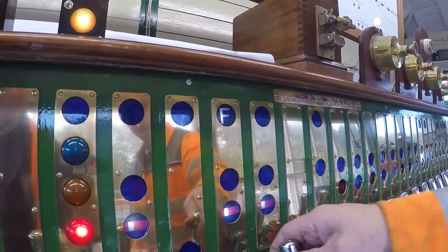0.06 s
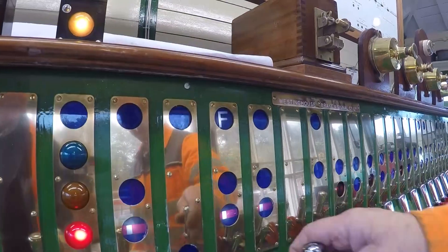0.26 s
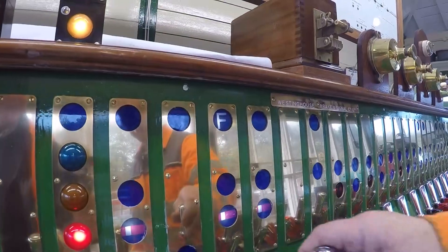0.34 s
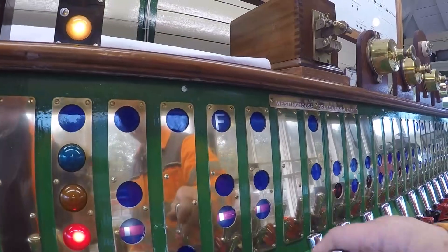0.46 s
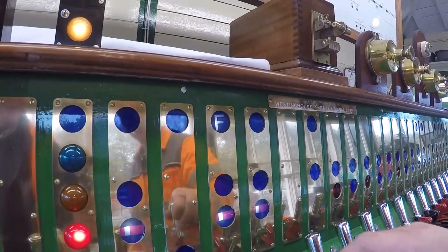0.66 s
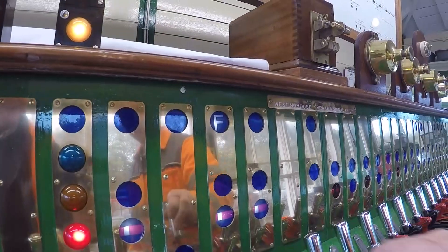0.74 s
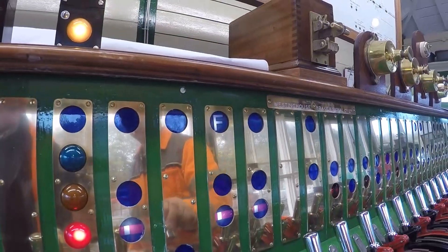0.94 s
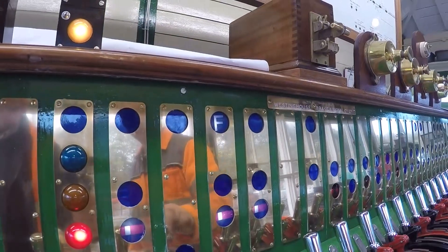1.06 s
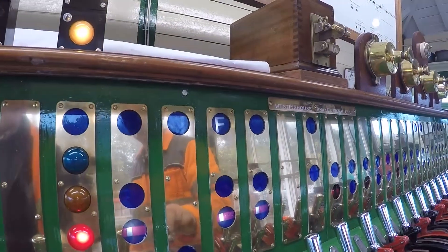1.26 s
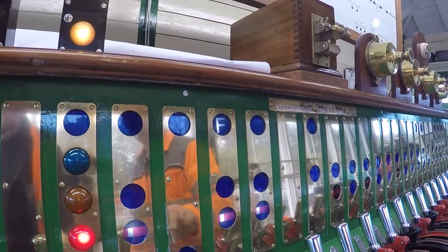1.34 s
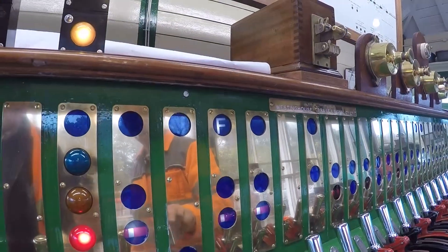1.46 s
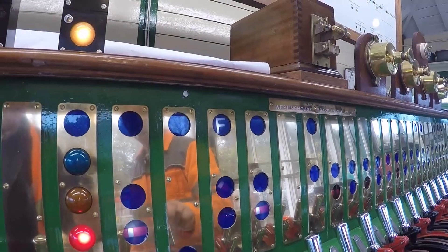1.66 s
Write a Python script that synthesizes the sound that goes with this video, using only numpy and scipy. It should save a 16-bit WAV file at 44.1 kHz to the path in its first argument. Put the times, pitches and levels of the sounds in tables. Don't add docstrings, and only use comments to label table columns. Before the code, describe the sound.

Metal levers clank and clack in a wooden signal cabin, rattling, knocking home and snapping shut

```python
import sys
import numpy as np
from scipy import signal
from scipy.io import wavfile
from scipy.ndimage import uniform_filter1d

SR = 44100
rng = np.random.default_rng(int(sys.argv[2]) if len(sys.argv) > 2 else 0)


def nominal_scale(level):
    x = np.asarray(level, float) / 20
    return 10 ** x


def log_audio(samples):
    frames = np.atleast_2d(samples).T
    limited = np.clip(frames, -1, 1)
    pcm = np.round(limited * 32767).astype(np.int16)
    wavfile.write(sys.argv[1], SR, pcm)


N = 74970
LEAD = SR // 5


def evened(x):
    return x / np.sqrt(np.mean(x ** 2) + 1e-20)


def read(points, hz):
    f, value = np.transpose(points)
    return np.interp(np.log(hz + 1), np.log(f + 1), value)


def lowpassed(x, hz):
    taps = signal.firwin(255, hz, window=("kaiser", 8), fs=SR)
    return signal.oaconvolve(x, taps, "same")


def shade(colour, bands, hz):
    humps = sum((nominal_scale(2 * db) - 1) / (1 + (2 * (hz - f) / width) ** 2) for f, width, db in bands)
    broad = nominal_scale(np.maximum(read(colour, hz), -100))
    return broad * np.sqrt(np.maximum(1 + humps, .01))


def causal(colour, bands, size=4096):
    hz = abs(np.fft.fftfreq(size, 1 / SR))
    log_gain = np.log(shade(colour, bands, hz))
    taps = np.fft.ifft(np.exp(np.conj(signal.hilbert(log_gain)))).real
    half = size // 2
    if abs(taps[:half]).sum() <= abs(taps[half:]).sum():
        taps = np.roll(taps[::-1], 1)
    return taps[:half] / np.linalg.norm(taps)


# frequency in Hz, t60 in seconds.
CABIN_T60 = [(150, 1), (500, 0.28), (1500, 0.44), (4000, 0.47), (9000, 0.33), (15000, .24)]


def cabin(power, colour, bands):
    delay_s, build_s = 0.0041, 0.0058
    hz, t, z = signal.stft(rng.standard_normal(len(power)), SR, nperseg=256, noverlap=192)
    fed = np.interp(t, np.arange(len(power)) / SR, uniform_filter1d(power, 64))
    build = np.clip((t - delay_s) / build_s, 0, 1)
    decay = nominal_scale(-120 * t / read(CABIN_T60, hz)[:, None]) * build
    decay = decay / decay.sum(1)[:, None]
    stored = signal.fftconvolve(fed[None], decay, axes=1)[:, :len(t)]
    tint = evened(shade(colour, bands, hz))[:, None]
    tail = signal.istft(z * np.sqrt(abs(stored)) * tint, SR, nperseg=256, noverlap=192)[1]
    return lowpassed(tail[:len(power)], 15200)


def ringing(t, power, pitches_hz, modes):
    waver_hz = 60.07
    out, slow = np.zeros(len(t)), t[::32]
    for hz, (db, t60) in zip(pitches_hz, modes):
        kept = nominal_scale(-120 / t60 / SR)
        stored = signal.lfilter([1e-3], [1, -kept], power)
        rates, starts = rng.random((2, 8, 1))
        wavers = np.exp(2j * np.pi * (waver_hz * (2 * rates - 1) * slow + starts))
        flutter = 0.62 + 1.04 * wavers.sum(0) / np.sqrt(8)
        tone = (np.exp(2j * np.pi * hz * t) * np.interp(t, slow, flutter)).imag
        out += nominal_scale(db) * np.sqrt(stored) * tone
    return out


def part(blows, colour, bands, pitches_hz, modes, ring_db, tail_db):
    rise_s, grain_db = .0009, 1.67
    t = (np.arange(N + LEAD) - LEAD) / SR
    power = np.zeros(len(t))
    for s, db, hold, t60 in blows:
        onset = np.clip((t - s) / rise_s, 0, 1) ** 2
        power += onset * nominal_scale(2 * (db - 60 * np.maximum(t - s - hold, 0) / t60))
    noise, grain = rng.standard_normal((2, len(t)))
    contacts = evened(noise * nominal_scale(grain_db * evened(uniform_filter1d(grain, 90))))
    chatter = signal.fftconvolve(np.sqrt(power) * contacts, causal(colour, bands))[:len(t)]
    near = lowpassed(chatter, 15200)
    tail = nominal_scale(tail_db) * cabin(power, colour, bands)
    ring = nominal_scale(ring_db) * ringing(t, power, pitches_hz, modes)
    return (near + tail + ring)[LEAD:]


# frequency in Hz, level in dB.
AIR_COLOUR = [(26, -38), (45, 5.5), (307, -20), (702, -22), (1260, -23), (2000, -32), (2310, -28),
              (13600, -49.5), (15000, -46)]


def air():
    level_db = -44.5
    frames, hz = N // 256 + 5, np.fft.rfftfreq(1024, 1 / SR)
    a, b, patches = rng.standard_normal((frames, 513, 3)).T
    patches = evened(uniform_filter1d(uniform_filter1d(patches, 10, 0), 12, 1))
    heard = ((hz > 40) & (hz < 14200))[:, None]
    z = (a + 1j * b) * nominal_scale(read(AIR_COLOUR, hz)[:, None] + 2.1 * patches) * heard
    return nominal_scale(level_db) * evened(signal.istft(z, nperseg=1024, noverlap=768)[1][:N])


# time in seconds, pitch in Hz, level in dB.
RUMBLE_PATH = [(0.0, 31.9, -37), (0.112, 30.8, -44), (0.188, 29.95, -55), (0.292, 33.04, -43),
               (0.396, 31.65, -33.5), (0.478, 33.04, -51), (0.606, 32.96, -33), (0.804, 33.4, -43.5),
               (0.95, 33.44, -34.5), (1.088, 33.16, -48), (1.126, 34.8, -40.5), (1.278, 32.42, -36.5),
               (1.406, 33.25, -52), (1.528, 32.44, -38.5), (1.666, 30, -48), (1.7, 33.2, -65)]


def rumble():
    t = np.arange(N) / SR
    s, hz, db = np.transpose(RUMBLE_PATH)
    turns = np.cumsum(np.interp(t, s, hz)) / SR
    return np.sqrt(2) * nominal_scale(np.interp(t, s, db)) * np.sin(2 * np.pi * turns)


# start in seconds, level in dB, chatter hold in seconds, chatter t60 in seconds.
LINK_HITS = [
    (-.1, -54, 0.25, 0.57),
    (.216, -31, 0.011, 0.039),
    (.226, -27, 0.017, 0.14),
    (.41, -43, 0.033, 0.2),
]
# frequency in Hz, gain in dB.
LINK_TINT = [(200, -5), (550, -12), (800, -15), (1300, -3), (1800, -14), (4000, -18), (12000, -43),
             (15000, -101)]
LINK_PITCHES = [545, 1242, 1500]
# level in dB, t60 in seconds.
LINK_RINGS = [(0.5, 0.27), (-24, 0.066), (1, 0.09)]


def link():
    return part(LINK_HITS, LINK_TINT, [], LINK_PITCHES, LINK_RINGS, ring_db=-8.5, tail_db=-5)


# start in seconds, level in dB, chatter hold in seconds, chatter t60 in seconds.
CATCH_HITS = [
    (-.09, -26, 0.0024, 0.024),
    (1.3818, -12, 0.00071, 0.023),
    (1.385, -21, 0.0046, 0.056),
    (1.395, -30, 0.0031, 0.19),
]
# frequency in Hz, gain in dB.
CATCH_TINT = [(200, -11), (800, -13.5), (1200, -7), (2400, -10), (3600, -8.5), (5500, -13.5), (8000, -10),
              (15500, -19.5)]
# centre in Hz, width in Hz, dB over the colour.
CATCH_HUMPS = [(1110, 310, 6.5), (1710, 180, 2.7), (3540, 400, 7.3), (5410, 330, 7.8), (7260, 160, 2.7),
               (8020, 180, 9.5), (8920, 150, 10.4), (10000, 220, 5.7), (10750, 140, 2.7)]
CATCH_PITCHES = [345, 395, 1180, 1645, 3476, 3600, 3709, 8193, 8974, 10760]
# level in dB, t60 in seconds.
CATCH_RINGS = [(-11, 0.38), (-10, 0.2), (11, 0.015), (-14.5, 0.27), (-17, 0.39), (5.5, 0.016),
               (-11.5, 0.38), (-24, 0.3), (-34, 0.39), (-32, 0.16)]


def catch():
    return part(CATCH_HITS, CATCH_TINT, CATCH_HUMPS, CATCH_PITCHES, CATCH_RINGS, ring_db=-6.5, tail_db=-8)


# start in seconds, level in dB, t60 in seconds.
CONTACT_TICKS = [
    (-.02, -56, 0.27),
    (.2248, -39, 0.016),
    (.549, -44, 0.018),
    (1.1151, -13, .025),
    (1.3817, -19, 0.023),
]


def ticks():
    t = np.arange(N) / SR
    treble = signal.butter(2, 4800, "high", fs=SR, output="sos")
    hiss = signal.sosfilt(treble, rng.standard_normal(N))
    level = sum((t > s) * nominal_scale(db - 60 * abs(t - s) / t60) for s, db, t60 in CONTACT_TICKS)
    return lowpassed(hiss * level, 15600)


# start in seconds, pitch in Hz, level in dB, t60 in seconds.
STEEL_KNOCKS = [(.2155, 1330, -34, 0.11), (.2248, 4800, -8, 0.023), (.2255, 3840, -11, 0.028),
                (.226, 9200, -22.5, 0.035), (.545, 6000, -26, .02), (.546, 4300, -23, 0.042),
                (.5495, 4900, -22, 0.03), (.5495, 9700, -28, 0.028), (.7084, 2400, -31.5, 0.041),
                (.7592, 1020, -21.5, 0.025), (.7592, 1670, -19, 0.0092), (.7592, 550, -26, .03),
                (1.1148, 550, -14.5, .05), (1.1155, 1360, -18.5, 0.037), (1.1155, 3540, -21, 0.035),
                (1.119, 3300, -24.5, .04), (1.121, 4000, -28, .04), (1.165, 510, -28, 0.044),
                (1.3815, 2900, -17, .015), (1.3815, 7300, -11, 0.016), (1.3935, 3580, -22, 0.087),
                (1.382, 1195, -12.5, 0.046), (1.382, 3800, -17, 0.015), (1.452, 1680, -34, 0.073),
                (.567, 6600, -20, 0.045), (.568, 3820, -24, 0.023), (.217, 577, -29, 0.069),
                (1.1165, 420, -27.5, .05), (1.115, 6400, -19, .025), (.746, 8400, -42, 0.11),
                (.747, 6400, -42, 0.073), (.759, 10000, -42, 0.082), (.775, 7000, -37, .08),
                (.828, 6200, -44, .1), (.833, 10650, -51, 0.14), (.81, 6020, -37, .08),
                (.695, 6400, -40, 0.13), (.605, 6510, -32, 0.17)]


def knocks():
    rise_s = 0.00079
    t, out = np.arange(N) / SR, np.zeros(N)
    for s, hz, db, t60 in STEEL_KNOCKS:
        rise = 1 - np.exp(-np.maximum(t - s, 0) / rise_s)
        out += rise * nominal_scale(db - 60 * abs(t - s) / t60) * np.sin(2 * np.pi * hz * (t - s))
    return lowpassed(out, 15600)


# start in seconds, level in dB, chatter hold in seconds, chatter t60 in seconds.
FRAME_HITS = [
    (.2195, -27, 0.0062, .02),
    (.2252, -15.5, 0.0027, 0.025),
    (.238, -23, 0.032, 0.32),
    (.40, -41.5, 0.016, 0.23),
    (.546, -27, 0.0051, 0.026),
    (.5495, -23, 0.0037, 0.085),
    (.566, -25.5, 0.018, 0.29),
]
# frequency in Hz, gain in dB.
FRAME_TINT = [(350, -13.5), (550, -9.5), (1200, -8), (2300, -6), (4600, -2.5), (7000, -7.5), (15000, -26.5),
              (15500, -38)]
# centre in Hz, width in Hz, dB over the colour.
FRAME_HUMPS = [(1080, 110, 7), (2570, 200, 1.5), (3900, 180, 3), (4300, 140, 1), (5000, 360, 2),
               (6400, 86, 2), (7500, 97, -9)]
FRAME_PITCHES = [1036, 2598, 3671, 3957, 4350, 4662, 4780, 5076, 5640, 6298, 6372, 7455, 9012]
# level in dB, t60 in seconds.
FRAME_RINGS = [(0.5, 0.33), (-9.5, 0.85), (-8, .33), (0, 0.22), (3, 0.17), (-28, .38), (-1, 0.018),
               (-0.5, 0.19), (2.5, 0.13), (-2, 0.2), (-6, 0.21), (-25, 0.25), (-7, 0.21)]


def locking_frame():
    return part(FRAME_HITS, FRAME_TINT, FRAME_HUMPS, FRAME_PITCHES, FRAME_RINGS, ring_db=-10.5, tail_db=-1.8)


# start in seconds, level of the low board in dB, of the high board in dB.
FLOOR_SHOVES = [(0.227, -27.5, -32.5), (0.271, -26.5, -32), (.40, -43, -47), (0.551, -30, -35),
                (0.581, -37, -36.5), (0.712, -33.5, -44.5), (.80, -32, -66), (1.118, -33, -39.5),
                (1.21, -38, -46), (1.391, -43, -42), (1.48, -42, -81)]
# pitch in Hz, t60 in seconds, rise in seconds.
FLOOR_BOARDS = [
    (104.7, 0.28, 0.013),
    (168.3, 0.28, 0.0025),
]


def floorboards():
    t, out = np.arange(N) / SR, np.zeros(N)
    for s, *levels_db in FLOOR_SHOVES:
        u = np.maximum(t - s, 0)
        for (hz, t60, rise), db in zip(FLOOR_BOARDS, levels_db):
            pitch_hz = hz * (.92 + 0.1256 * rng.random())
            swell = (1 - np.exp(-u / rise)) ** 2 * nominal_scale(db + 7 - 60 * u / t60)
            out += swell * np.sin(2 * np.pi * pitch_hz * u)
    return out


# start in seconds, level in dB, chatter hold in seconds, chatter t60 in seconds.
TAPPET_HITS = [
    (.255, -34, 0.012, 0.032),
    (.5665, -27.5, 0.0035, 0.07),
    (.70, -53, 0.005, 0.026),
]
# frequency in Hz, gain in dB.
TAPPET_TINT = [(500, -14.5), (4000, -18), (6500, -27), (9000, -24), (12000, -27), (15000, -32),
               (15500, -93)]
TAPPET_PITCHES = [3957, 6363, 6514]
# level in dB, t60 in seconds.
TAPPET_RINGS = [(-19, 0.2), (-1.5, 0.29), (-0.5, 0.33)]


def tappet():
    return part(TAPPET_HITS, TAPPET_TINT, [], TAPPET_PITCHES, TAPPET_RINGS, ring_db=3.5, tail_db=-13)


# start in seconds, level in dB, chatter hold in seconds, chatter t60 in seconds.
SLIDE_HITS = [
    (.708, -35, 0.012, 0.15),
    (.737, -34.5, 0.032, 0.11),
    (.7595, -34, 0.0015, 0.067),
    (.768, -33, 0.025, 0.22),
]
# frequency in Hz, gain in dB.
SLIDE_TINT = [(150, 1), (457, 4.5), (1060, 1), (3000, -1), (7040, -7.5), (14700, -36.5), (15200, -102)]
# centre in Hz, width in Hz, dB over the colour.
SLIDE_HUMPS = [(2380, 200, 2.9), (3070, 92, 2.9), (4230, 200, 5.7), (5100, 400, 4.8), (5830, 100, 3.7),
               (7300, 85, 5.3), (8410, 130, 6.7), (9050, 150, 7.2), (10500, 140, 7.3)]
SLIDE_PITCHES = [786, 1039, 2476, 3074, 4113, 4856, 5050, 6024, 6971, 8360, 9179, 10650]
# level in dB, t60 in seconds.
SLIDE_RINGS = [(4, 0.29), (9, 0.35), (10.5, 0.14), (5, 0.21), (-0.5, 0.28), (-7, 0.25), (0, 0.32),
               (-3, 0.42), (-15, .26), (-14, 0.25), (-7, 0.32), (-14, .24)]


def sliding_bar():
    return part(SLIDE_HITS, SLIDE_TINT, SLIDE_HUMPS, SLIDE_PITCHES, SLIDE_RINGS, ring_db=-16, tail_db=-2)


# start in seconds, level in dB, chatter hold in seconds, chatter t60 in seconds.
STOP_HITS = [
    (1.1132, -28, 0.0014, 0.024),
    (1.1148, -14, 0.0028, 0.028),
    (1.126, -30.5, 0.012, 0.25),
]
# frequency in Hz, gain in dB.
STOP_TINT = [(100, -21), (220, -11), (560, -10), (860, -11), (1250, -9.5), (2000, -15), (9000, -18.5),
             (15500, -26.5)]
# centre in Hz, width in Hz, dB over the colour.
STOP_HUMPS = [(206, 60, 8.5), (374, 40, 4.2), (590, 130, 5.8), (1330, 160, 2.8), (2220, 290, 7),
              (3310, 200, 5.8), (3700, 130, 6.3), (4470, 56, 2.4)]
STOP_PITCHES = [213, 385, 511, 559, 689, 1153, 1334]
# level in dB, t60 in seconds.
STOP_RINGS = [(3, 0.11), (-15, 0.13), (-3.5, 0.13), (3.5, 0.049), (-35, 0.11), (-22, 0.036), (-9, 0.062)]


def lever_stop():
    return part(STOP_HITS, STOP_TINT, STOP_HUMPS, STOP_PITCHES, STOP_RINGS, ring_db=-6, tail_db=-8)


def scene():
    background = air() + rumble()
    throws = link() + ticks() + knocks() + locking_frame() + floorboards() + tappet()
    closing = sliding_bar() + lever_stop() + catch()
    return (background + throws + closing)[None]


def low_pass(x):
    return signal.sosfilt(signal.butter(12, 16530, fs=SR, output="sos"), x)


def record(dry):
    return low_pass(dry)


dry = scene()
out = record(dry)
log_audio(out)
```